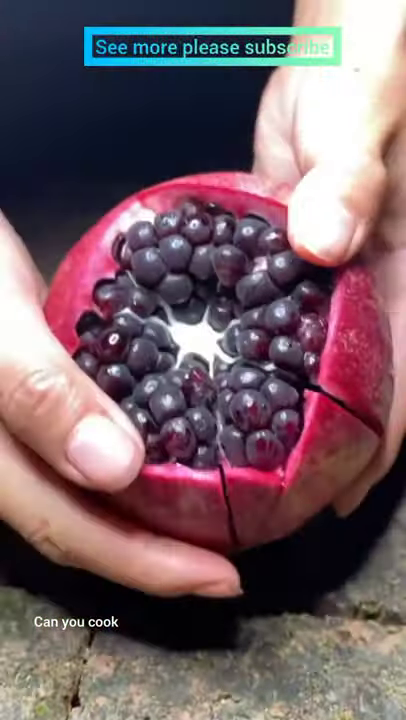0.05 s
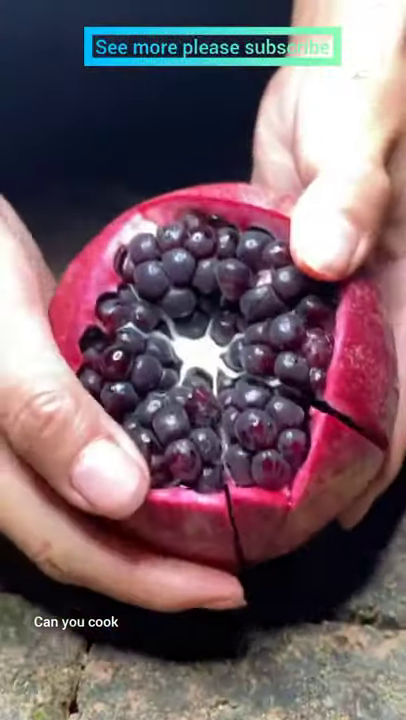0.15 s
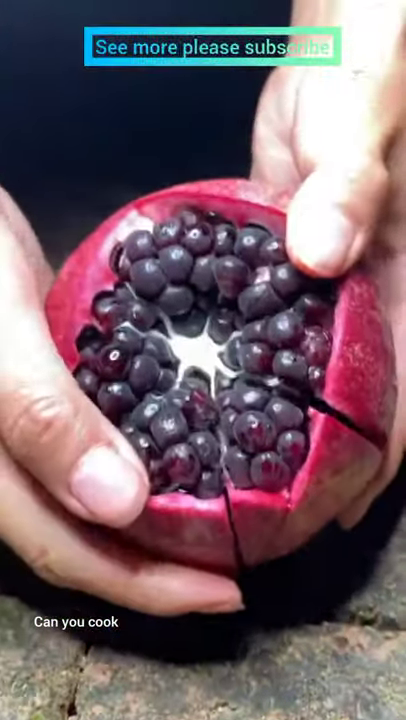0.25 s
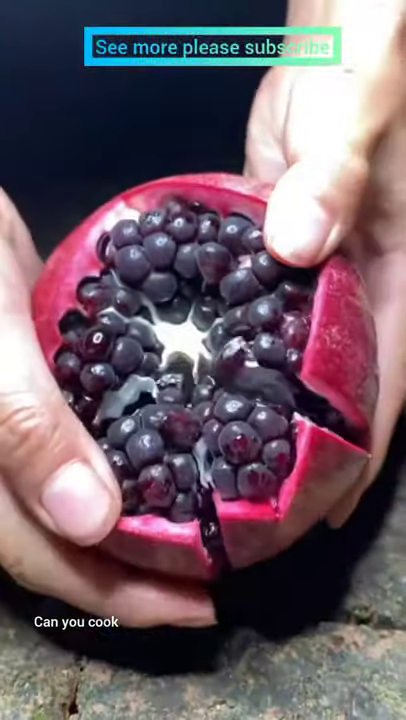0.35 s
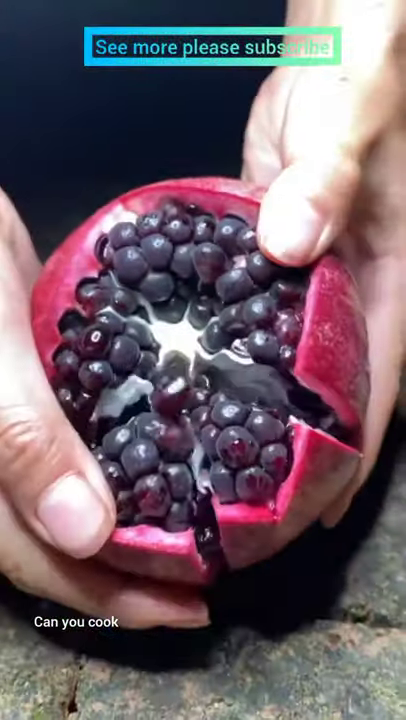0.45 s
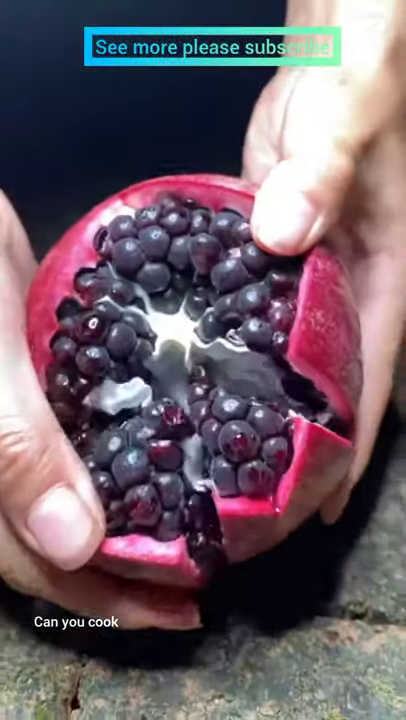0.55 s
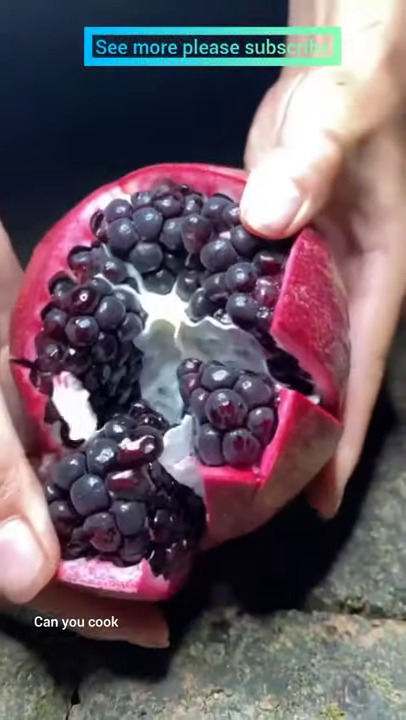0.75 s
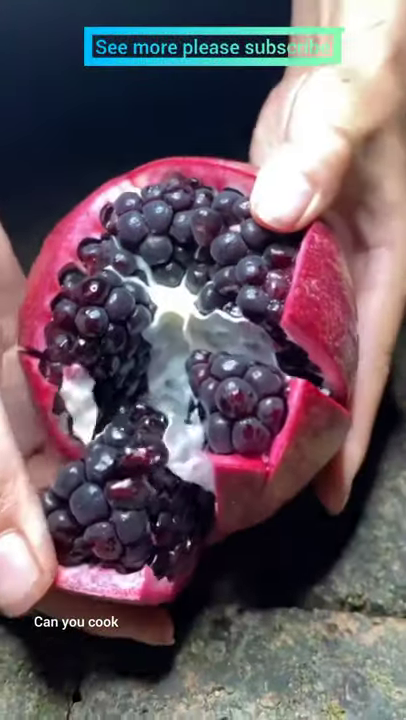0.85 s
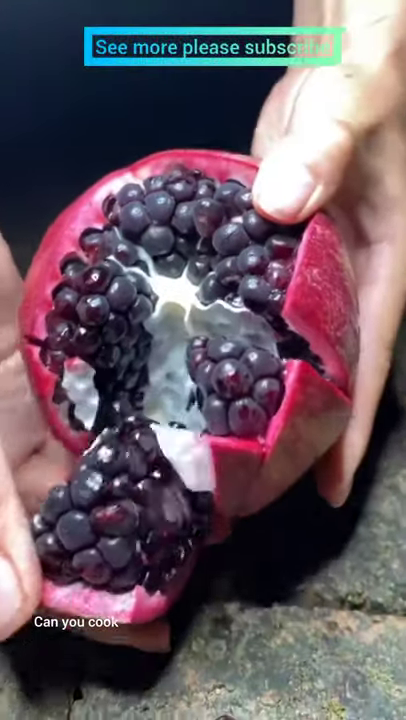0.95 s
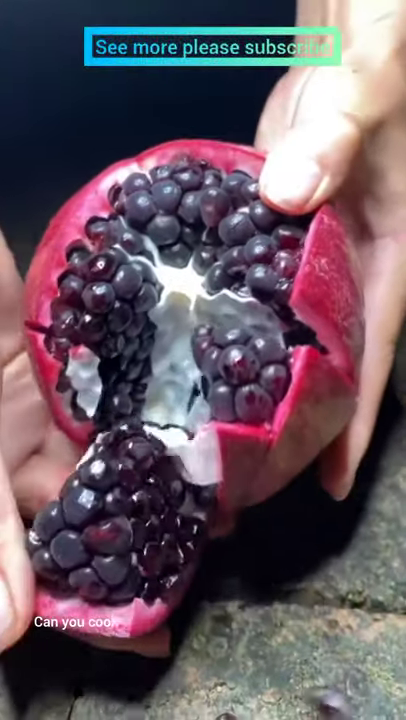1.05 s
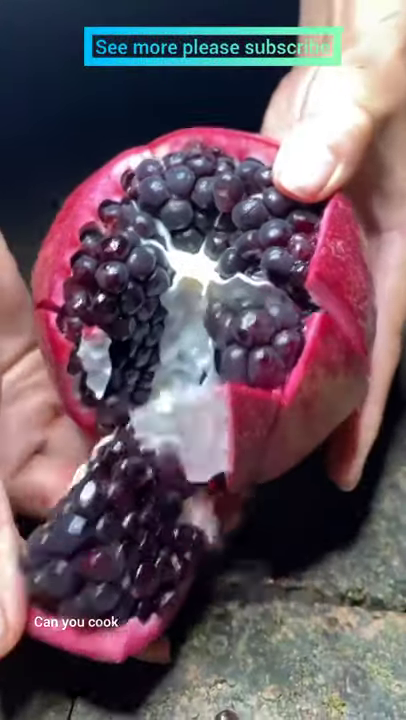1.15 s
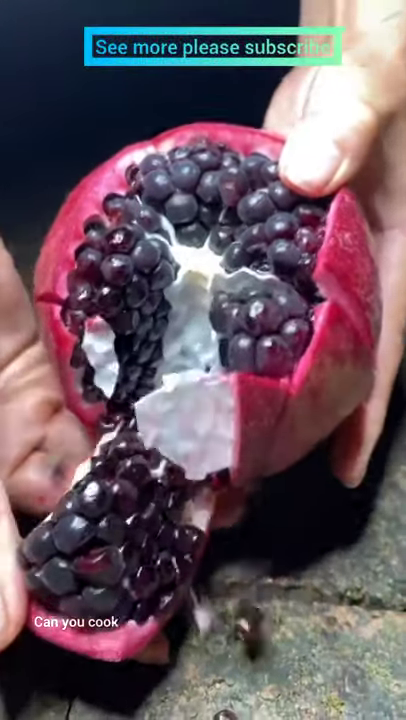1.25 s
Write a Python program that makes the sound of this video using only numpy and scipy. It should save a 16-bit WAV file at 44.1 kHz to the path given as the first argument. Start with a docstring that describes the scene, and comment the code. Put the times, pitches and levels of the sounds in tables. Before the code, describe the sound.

A pomegranate is torn open by hand with a hollow crunch and moist crackling.

```python
"""Two hands pull a scored pomegranate apart, close to a pair of microphones.
Over low room tone, a faint whine and the rub of palms, the first fibres snap. At 0.2 s the rind
gives way with one hollow crunch. Then pith and membranes tear in short crackling pulls, with single
fibres and seeds snapping and wet surfaces squeaking, brighter as the piece comes free."""
import sys
import numpy as np
from scipy import signal
from scipy.fft import rfft, irfft
from scipy.io import wavfile

SR = 44100
rng = np.random.default_rng(int(sys.argv[2]) if len(sys.argv) > 2 else 0)


def master_out(mix):
    """Clip the mix to full scale and print it as 16-bit PCM to the path in sys.argv[1]."""
    frames = np.transpose(np.atleast_2d(mix))
    ceiling = np.clip(frames, -1, 1)
    pcm = np.round(ceiling * 32767).astype(np.int16)
    wavfile.write(sys.argv[1], SR, pcm)


N = 57330
TIME = np.arange(N) / SR
FREQ = np.fft.rfftfreq(N, 1 / SR) + 1  # 1 Hz up keeps the logarithms finite


def amp(db):
    """Decibels to gain."""
    return 10 ** (np.asarray(db) / 20)


def unit(x):
    """Scales to rms 1."""
    return x / np.sqrt(np.mean(x ** 2) + 1e-20)


def level(points):
    """Gain over time from a few level points."""
    time_s, db = np.transpose(points)
    return amp(np.interp(TIME, time_s, db))


def swell(peak_s, rise_s, fall_s, hold_s=0):
    """Grows exponentially up to peak_s, holds, then dies away."""
    return np.exp(-np.maximum(np.maximum((peak_s - TIME) / rise_s, (TIME - peak_s - hold_s) / fall_s), 0))


def colour(points):
    """Gain at every frequency from a few spectrum points."""
    hz, db = np.transpose(points)
    return amp(np.interp(np.log(FREQ), np.log(hz), db))


def band(hz, octaves):
    """A bell-shaped band on the octave scale, tilted toward the bass."""
    return np.exp(-(np.log2(FREQ / hz) / (2 * octaves)) ** 2) / np.sqrt(FREQ + hz / 10)


def shaped(x, gain):
    """Filters by a gain curve, to rms 1."""
    return unit(irfft(rfft(x) * gain, N))


def stereo(pair, width):
    """Left and right from a centre and a side signal."""
    centre, side = pair
    return np.array([centre + width * side, centre - width * side])


def pulse(time_s, hz, octaves):
    """One short pressure pulse, peak 1; the flesh carries its treble a little ahead of its bass."""
    lead_s_per_octave = 0.000584
    arrival_s = time_s - lead_s_per_octave * np.log2(FREQ / hz)
    phase = -2 * np.pi * np.cumsum(arrival_s) * SR / N
    wave = irfft(band(hz, octaves) * np.exp(1j * phase), N)
    return wave / abs(wave).max()


def crackle(width=0.48, scatter_db=1, fibres_per_s=7000):
    """A dense train of tiny fibre breaks of uneven size, each at its own place from left to right."""
    size = amp(scatter_db * np.minimum(rng.exponential(1, N), 4))
    polarity = np.sign(rng.standard_normal(N))
    breaks = size * polarity * (rng.random(N) < fibres_per_s / SR)
    place = unit(np.sin(2 * np.pi * rng.random(N)))
    return stereo([breaks, breaks * place], width)


def stereo_noise(gain):
    """Filtered noise, independent on left and right."""
    return shaped(stereo(rng.standard_normal((2, N)), width=1), gain)


def room_tone():
    """The low, steady hum and hiss of the room."""
    # Spectrum of the room: frequency_hz, gain_db
    room_spectrum = [(20, -14), (90, -1), (160, -2), (400, -9.5), (1000, -17.5), (2000, -21), (4000, -18),
                     (8000, -19.5), (16000, -22.5)]
    return amp(-72) * stereo_noise(colour(room_spectrum))


def whine(pitch_hz=2338, half_width_hz=68):
    """A thin, fuzzy whine that comes and goes in the background."""
    # Loudness of the whine: time_s, level_db
    whine_levels = [(0, -69), (.12, -90), (.16, -56), (.3, -58.5), (.38, -71), (.62, -71), (.7, -58.5),
                    (.78, -60.5), (.83, -59), (1.0, -82), (1.12, -72), (1.17, -59.5), (1.3, -59.5)]
    resonance = 1 / (1 + ((FREQ - pitch_hz) / half_width_hz) ** 2)
    return level(whine_levels) * stereo_noise(resonance)


def echoes(x, t60_s=0.081, level_db=-9.5):
    """Brief diffuse reflections from the stone and surroundings, arriving after 2 ms."""
    t = TIME[:SR // 4]
    decay = np.exp(-np.log(1000) * t / t60_s) * (t > .002)
    tail = rng.standard_normal((2, len(t))) * decay
    tail /= np.linalg.norm(tail[0])
    return amp(level_db) * signal.fftconvolve(x, tail, axes=1)[:, :N]


def hands():
    """The soft, low rumble of palms rubbing on the rind."""
    # Loudness of the rubbing: time_s, level_db
    rub_levels = [(0, -71), (.15, -72.5), (.3, -69.5), (.55, -73.5), (.62, -104), (.78, -91), (.9, -73),
                  (1.02, -85), (1.3, -74.5)]
    return level(rub_levels) * shaped(rng.standard_normal(N), band(hz=98, octaves=0.97))


def squeaks():
    """Wet seeds and rind rub: each run of tiny slips rings one narrow resonance."""
    # Runs of slips: peak_s, level_db, pitch_hz, rise_s, fall_s
    slips = [(0.4, -57, 980, .01, .03), (.91, -66.5, 207, 0.033, 0.027), (0.813, -55.5, 4800, .02, 0.014),
             (1.087, -48.5, 2620, 0.008, 0.024), (1.096, -46.5, 1620, 0.0087, 0.01)]
    return sum(amp(db) * swell(peak_s, rise_s, fall_s) * shaped(crackle(), band(hz, octaves=0.052))
               for peak_s, db, hz, rise_s, fall_s in slips)


def snaps(low_cut_hz=374):
    """Single fibres and seeds break, too small to carry bass, each in a few milliseconds of splinters."""
    # Breaks: time_s, level_db, pitch_hz, spread_octaves, splinter_db, left_over_right_db
    breaks = [(0.0094, -36.5, 2780, 0.62, -9.5, -3), (0.056, -42, 2270, 0.77, -2, -3),
              (0.0575, -40.5, 880, 0.65, -2.5, -2), (0.1036, -44, 4870, 0.88, -17, -1),
              (.1785, -42, 2720, 0.74, 0, .5), (0.184, -44.5, 3100, 0.65, -16, 14),
              (.2545, -33.5, 5260, 0.28, 2, -2), (.257, -46.5, 1010, 0.77, 8.5, 20.5),
              (0.3146, -47, 4150, 0.4, 3, -1), (0.3953, -34.5, 3100, 0.46, -5, -2),
              (0.4105, -39, 3300, 0.34, -2.5, -12), (0.4338, -29.5, 2820, 1.06, 1.5, -3),
              (.434, -29, 4650, 1.23, -7, 1.5), (0.485, -30, 2780, 0.86, 0.5, -1.4),
              (0.4961, -27.5, 3790, 0.71, -4, -.4), (.497, -29, 2880, 0.98, -5, 2),
              (0.506, -34, 3830, 0.42, -13, -3), (.5302, -33.5, 1400, 1.06, 4.5, 4),
              (.5309, -26, 2950, 0.21, -6.5, -7.5), (0.54, -31, 4540, .4, -8, -8),
              (.543, -32.5, 3980, 0.41, -10, -18), (0.5454, -28, 4130, 0.43, 3.5, -1),
              (0.5514, -37, 694, 0.69, -10, 2), (0.5509, -26, 4120, 0.19, 0.5, -1.5),
              (.631, -39, 4000, 0.4, 3, -5), (0.666, -43, 2920, 1.23, -9, 16),
              (0.6775, -39.5, 3960, 0.87, 7, 1), (0.7691, -45, 3100, 0.77, -4.5, -5),
              (0.8271, -33.5, 2270, 0.88, -11, 7), (0.8278, -21.5, 5160, 0.35, -8.5, -3),
              (0.8308, -45.5, 8600, 0.53, 4.5, 5), (0.8375, -34.5, 2960, 0.73, -13.5, -12),
              (0.8545, -40, 3270, 0.89, -29, -18), (0.8795, -31, 6700, 0.67, 4, -3.5),
              (0.898, -37.5, 4300, 0.99, 1.5, 11.5), (0.9007, -37, 5100, 1, -16, -18),
              (0.9611, -44.5, 6370, 0.7, 2.5, 5.7), (0.974, -45, 7160, 0.38, -5, -7),
              (1.017, -52, 6730, 0.58, 7, 6), (1.035, -46.5, 4440, 0.84, 1.5, -8),
              (1.098, -27.5, 7040, 1.34, -9, -1.3), (1.1036, -37.5, 5930, 1.0, 3.5, -4),
              (1.1273, -34, 4000, .85, -0.5, 0), (1.1307, -41, 4300, 0.68, 1, -11),
              (1.133, -53.5, 480, 0.6, -4, 1), (1.23, -56, 3180, 0.94, 5.5, -1)]
    low_cut = 1 / (1 + (low_cut_hz / FREQ) ** 2)
    sound = np.zeros((2, N))
    for time_s, db, hz, octaves, splinter_db, pan_db in breaks:
        core = pulse(time_s, hz, 0.52 * octaves)
        burst = amp(splinter_db) / 2 * swell(time_s, rise_s=0.0017, fall_s=0.0018)
        splinters = burst * shaped(crackle(), band(hz, 1.63 * octaves))
        pan = amp([[pan_db / 2], [-pan_db / 2]])
        sound += amp(db) * pan * irfft(rfft(core + splinters) * low_cut, N)
    return sound


def tearing_pith(treble_from_hz=2750):
    """Crackle builds with the strain and fades as the pith lets go; thin membranes sound brighter."""
    # Pulls on the pith: peak_s, level_db, rise_s, fall_s, treble_db_per_octave
    pulls = [(.004, -49, 0.012, 0.0067, -1.5), (.04, -57.5, 0.037, 0.037, -3),
             (0.093, -55, 0.042, 0.063, -2), (0.18, -47, .006, 0.0068, -3), (0.224, -38, 0.015, 0.016, 3),
             (0.256, -44, 0.015, 0.0042, -3), (0.295, -59, 0.024, 0.043, -7),
             (0.4, -45.5, 0.019, .02, -0.5), (.431, -42, 0.011, 0.012, 0), (.504, -43, 0.018, .025, -3),
             (0.553, -43.5, 0.043, 0.037, -0.5), (0.67, -44, 0.034, 0.02, 1),
             (0.797, -55.5, 0.049, 0.0092, -1.5), (0.848, -46.5, 0.018, 0.036, 2),
             (0.905, -37.5, 0.02, 0.018, 6.5), (.976, -56, .012, 0.015, 4), (1.029, -53.5, 0.023, 0.016, 9),
             (1.097, -39.5, 0.017, 0.018, 6), (1.135, -45.5, 0.014, .014, 3),
             (1.228, -64.5, 0.029, 0.037, -4.5), (1.297, -64, 0.0057, .01, 2)]
    # Spectrum of tearing pith: frequency_hz, gain_db
    pith_spectrum = [(60, -16), (250, -16), (600, -8), (1000, -4), (1400, -5.5), (2000, -0.5), (3000, -1.5),
                     (5700, -2.5), (6700, -8), (8000, -5.5), (10000, -9.5), (13000, -11), (16000, -17.5)]
    sound = np.zeros((2, N))
    for peak_s, db, rise_s, fall_s, treble_slope in pulls:
        treble = amp(treble_slope * np.log2(np.hypot(FREQ, treble_from_hz)))
        fibres = shaped(crackle(width=0.82, scatter_db=2), colour(pith_spectrum) * treble)
        sound += amp(db) * swell(peak_s, rise_s, fall_s) * fibres
    return sound


def splitting_rind():
    """The rind gives way: a run of cracks in a dense crunch, the ring of the fruit and a soft thud."""
    # Cracks running through the rind: time_s, peak_db
    crack_run = [(0.201, -29), (0.2075, -24), (0.2109, -20), (0.2135, -21), (0.2186, -22)]
    # Spectrum of the splitting rind: frequency_hz, gain_db
    rind_spectrum = [(30, -15.5), (200, -20), (450, -12), (700, -12.5), (950, -3), (1450, -17.5),
                     (2100, -13), (2600, -0.5), (3300, -12.5), (4800, -17.5), (6000, -11.5), (7000, -24.5),
                     (12000, -22.5), (16000, -40)]
    # Ringing of the fruit in the cupped hands: pitch_hz, level_db, t60_s
    hollow_modes = [(942, -41, .1), (1111, -47, .08), (1234, -49, .07), (2120, -47, .07), (2357, -39, .08),
                    (2590, -38, .07), (2746, -38, .07), (2835, -43, .07), (2990, -43, .07),
                    (5830, -49, .06), (6140, -47, .06)]
    cracks = sum(amp(db) * pulse(time_s, hz=2600, octaves=0.2) for time_s, db in crack_run)
    crunch = shaped(crackle(width=0.54, scatter_db=2.5), colour(rind_spectrum))
    strain = amp(-30.5) * swell(peak_s=0.2032, rise_s=0.005, fall_s=0.012, hold_s=0.022)
    ring = np.zeros(N, complex)
    for hz, db, t60_s in hollow_modes:
        envelope = amp(db) * swell(peak_s=0.2143, rise_s=0.0083, fall_s=t60_s / np.log(1000))
        ring += envelope * np.exp(2j * np.pi * (hz * TIME + rng.random()))
    thud = amp(-40) * pulse(time_s=0.24, hz=320, octaves=1.5)
    return cracks + strain * crunch + stereo([ring.real, ring.imag], width=0.21) + thud


def scene():
    """The fruit and hands up close, with reflections, room tone and whine behind."""
    fruit = splitting_rind() + snaps() + tearing_pith() + squeaks()
    return fruit + echoes(fruit) + hands() + room_tone() + whine()


def record(dry):
    """Two close microphones hear the bass alike and the treble apart, up to a sharp band limit."""
    mono_below_hz, wide_above_hz, widening_db, limit_hz = 350, 7300, 2.5, 15900
    bass_narrowing = FREQ / np.hypot(FREQ, mono_below_hz)
    treble_widening = amp(widening_db / (1 + (wide_above_hz / FREQ) ** 4))
    side = irfft(rfft(dry[0] - dry[1]) * bass_narrowing * treble_widening, N) / 2
    heard = stereo([dry.mean(0), side], width=0.74)
    low_pass = signal.firwin(511, limit_hz, window=("kaiser", 9), fs=SR)
    return signal.oaconvolve(heard, low_pass[None], "same")


dry = scene()
out = record(dry)
master_out(out)
```